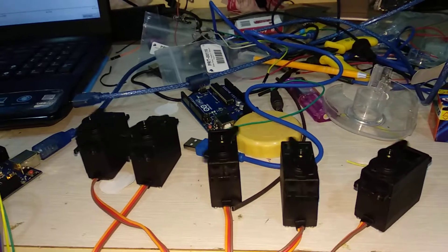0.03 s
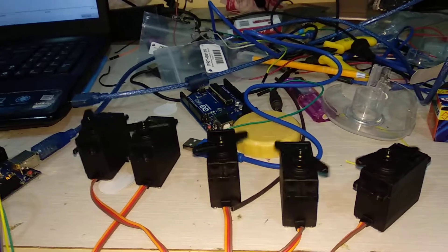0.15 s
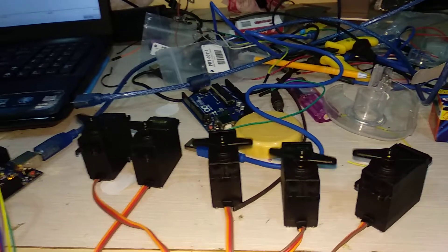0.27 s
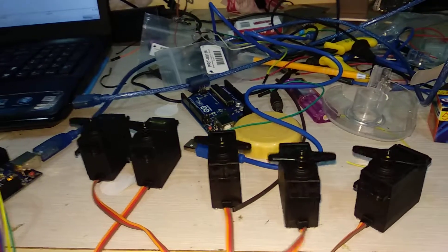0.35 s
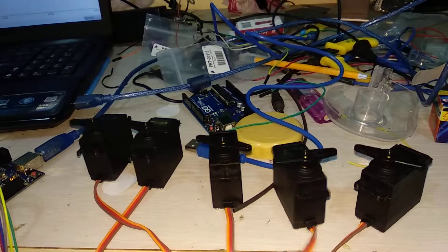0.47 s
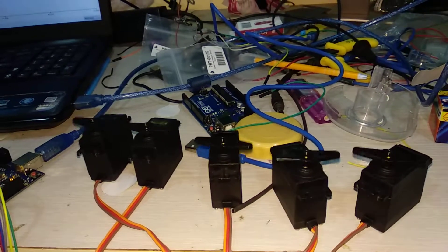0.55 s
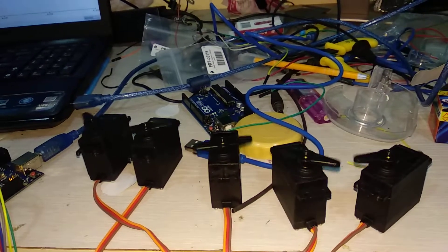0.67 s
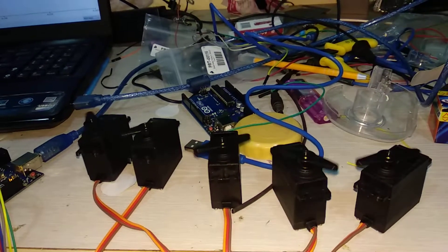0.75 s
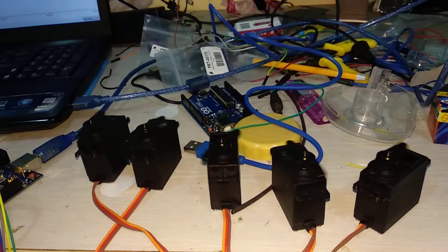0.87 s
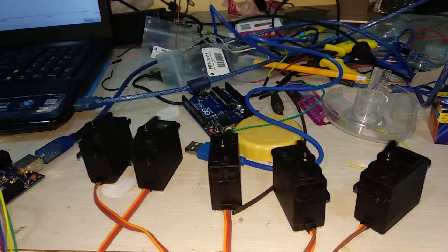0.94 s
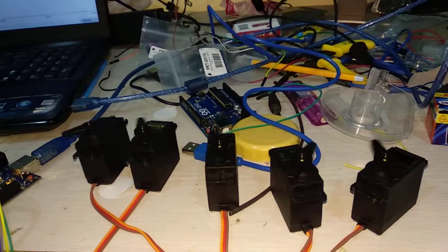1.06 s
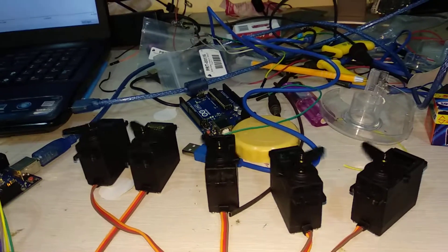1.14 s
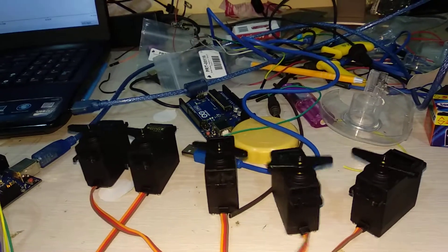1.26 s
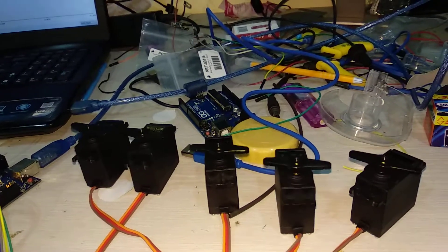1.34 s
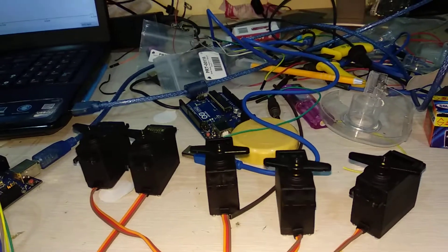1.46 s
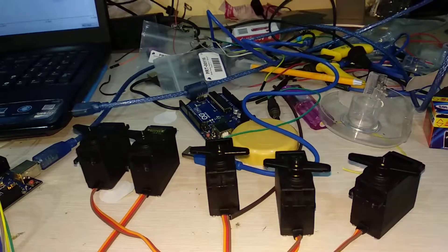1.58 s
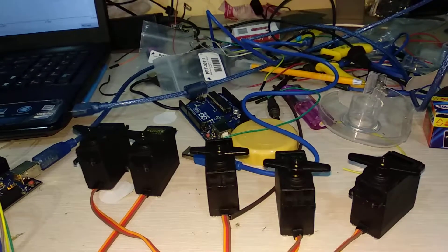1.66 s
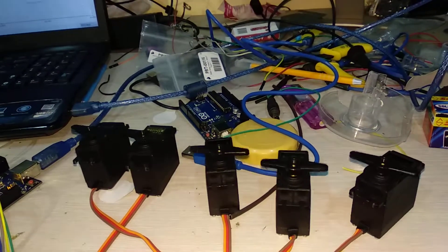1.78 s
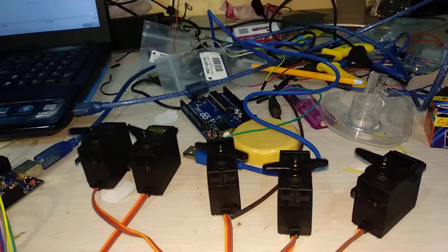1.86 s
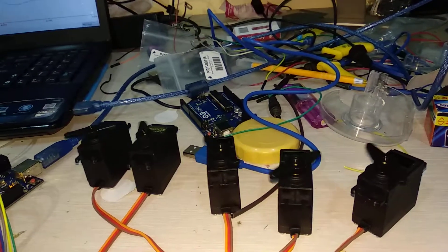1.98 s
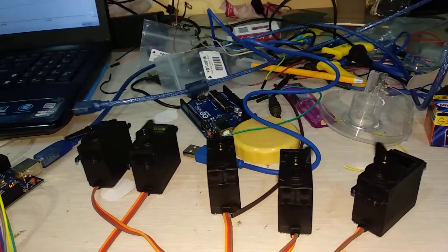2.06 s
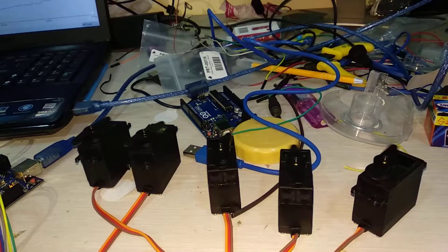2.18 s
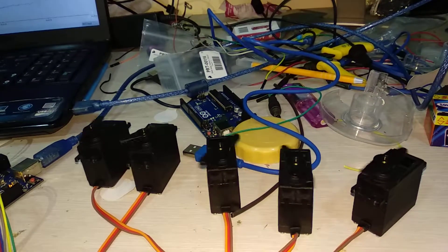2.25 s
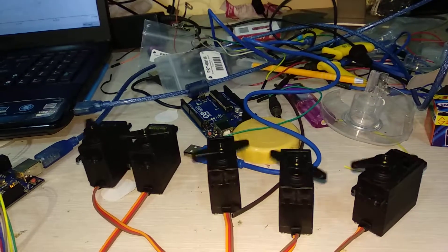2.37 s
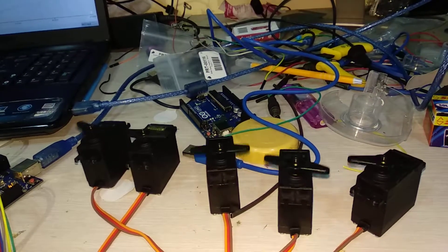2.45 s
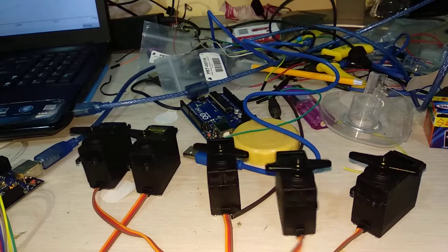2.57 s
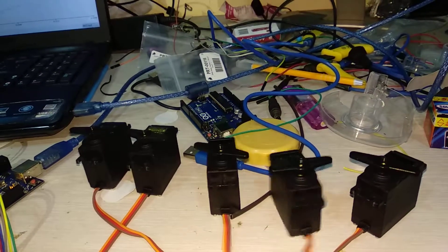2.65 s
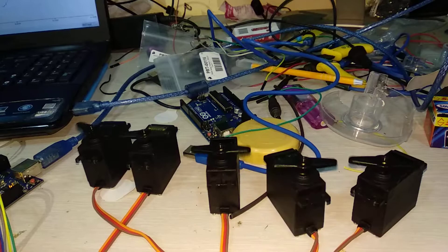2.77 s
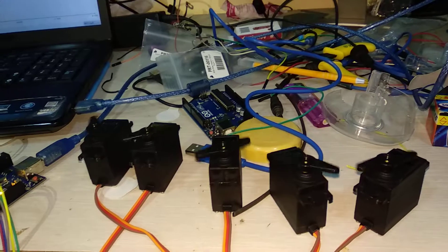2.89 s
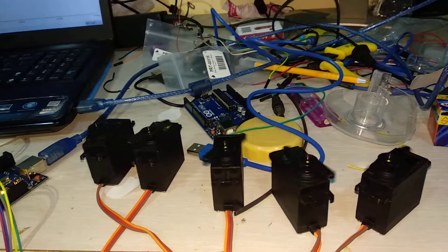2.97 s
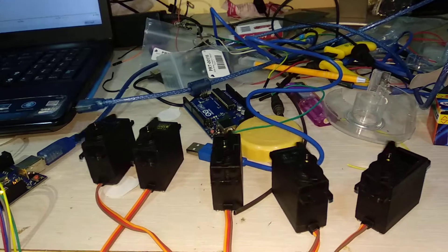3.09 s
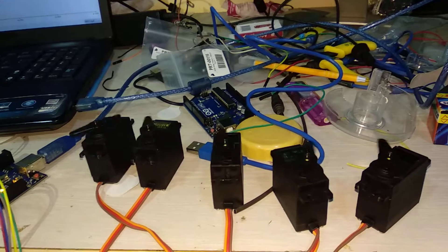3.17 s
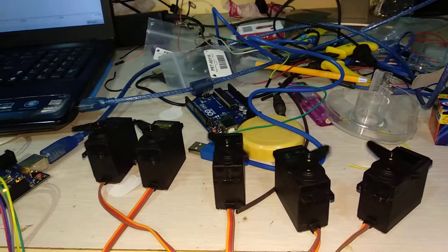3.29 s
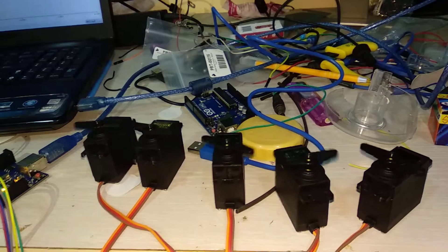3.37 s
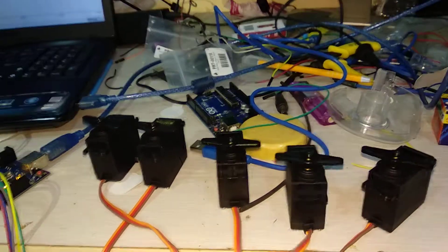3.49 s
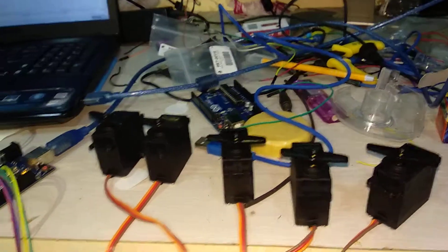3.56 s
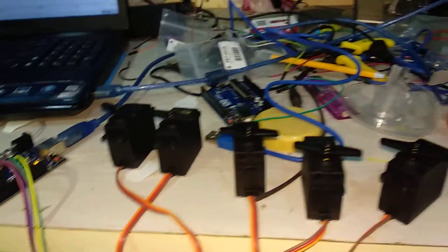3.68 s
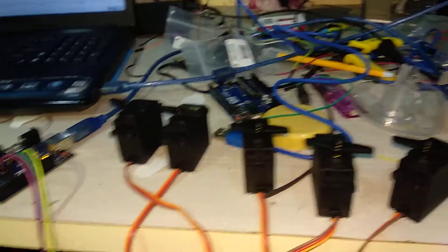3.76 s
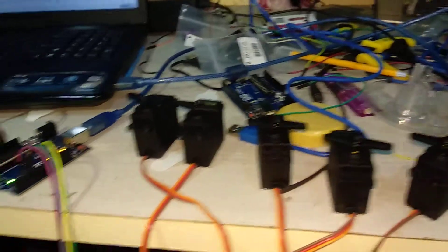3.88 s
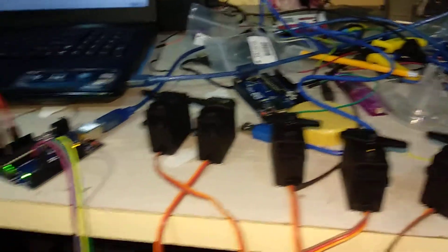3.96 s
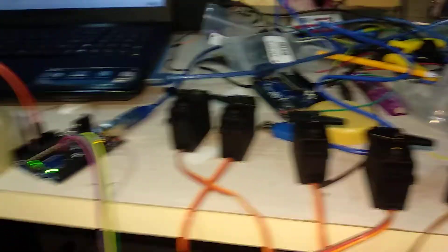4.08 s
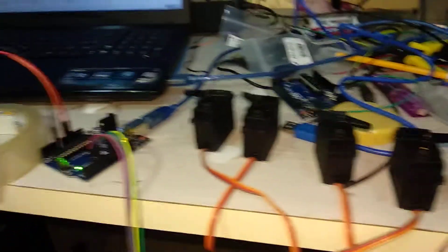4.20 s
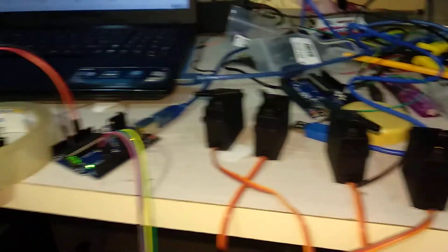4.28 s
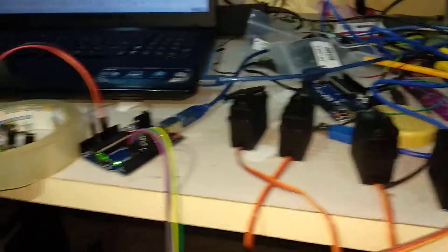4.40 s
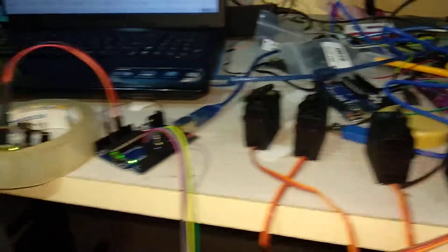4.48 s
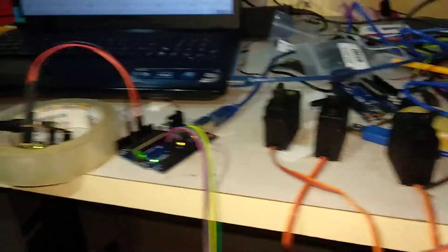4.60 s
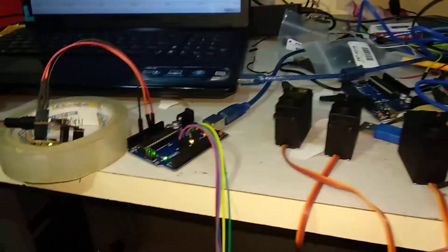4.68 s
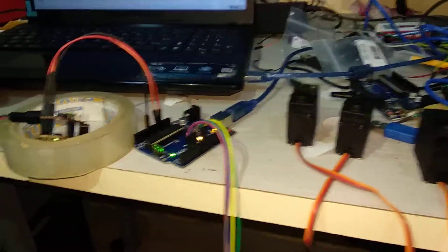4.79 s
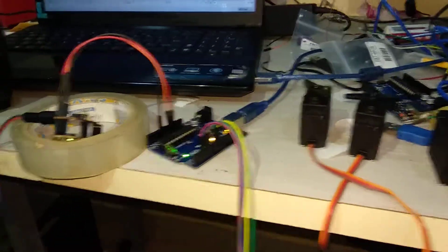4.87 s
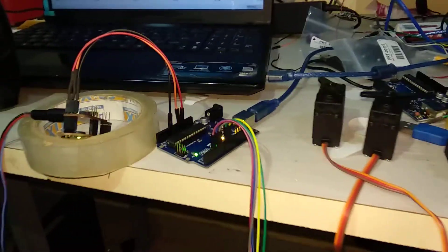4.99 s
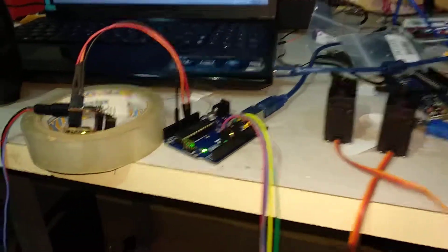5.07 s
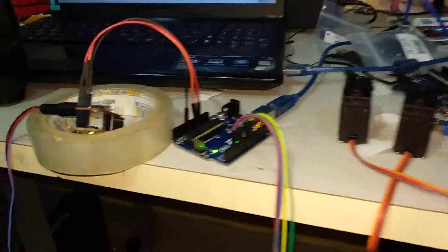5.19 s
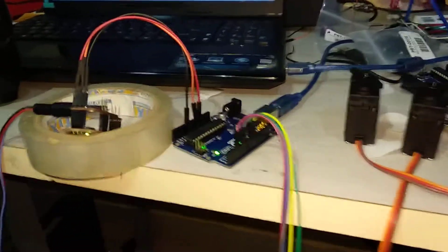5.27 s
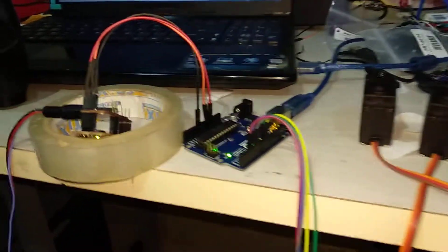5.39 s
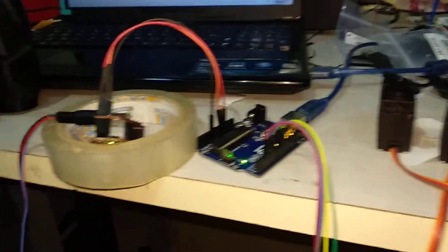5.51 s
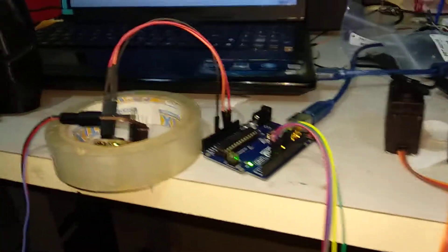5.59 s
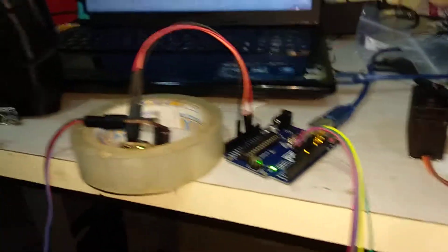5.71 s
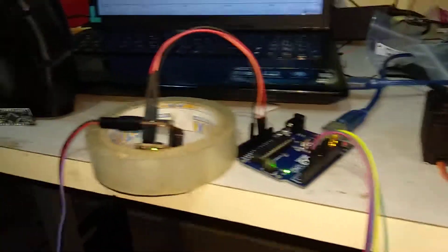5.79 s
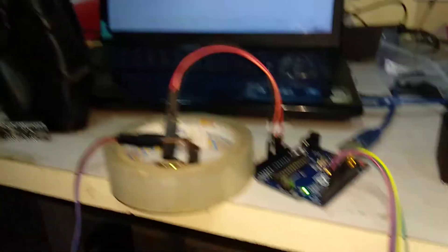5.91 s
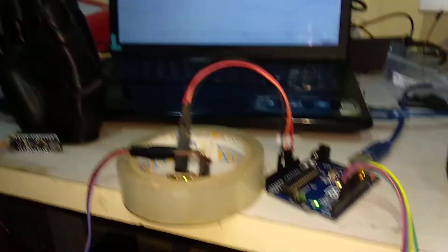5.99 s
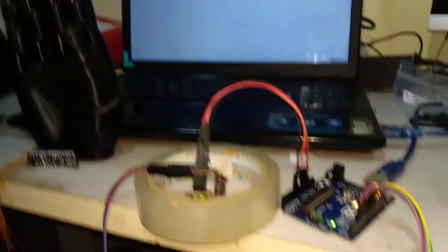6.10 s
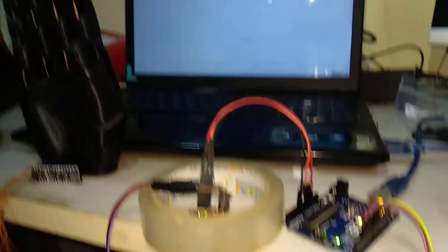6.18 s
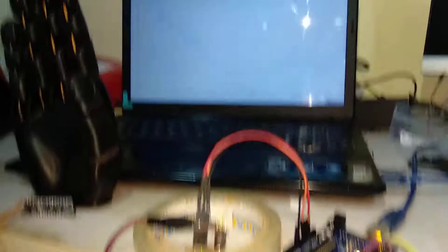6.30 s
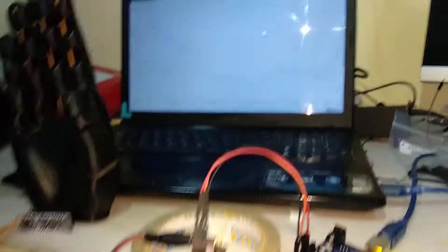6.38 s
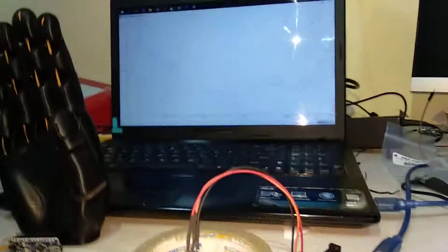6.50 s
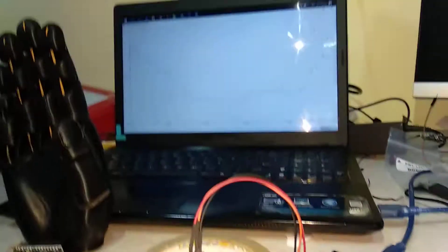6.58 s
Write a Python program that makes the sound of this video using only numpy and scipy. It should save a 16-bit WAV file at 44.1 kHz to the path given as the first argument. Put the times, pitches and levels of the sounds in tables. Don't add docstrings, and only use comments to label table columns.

```python
import sys
import numpy as np
from scipy import signal
from scipy.fft import rfft, irfft, next_fast_len
from scipy.io import wavfile
from scipy.ndimage import uniform_filter1d, minimum_filter1d

SR = 44100
rng = np.random.default_rng(int(sys.argv[2]) if len(sys.argv) > 2 else 0)


def convert_level_to_amplitude(level_db):
    exponent = np.asarray(level_db, float) / 20
    return 10 ** exponent


def persist_wave(psi):
    counts = np.round(np.clip(psi, -1, 1) * 32767).astype(np.int16)
    wavfile.write(sys.argv[1], SR, np.atleast_2d(counts).T)


N = 293264


def evened(x):
    return x / np.sqrt(np.mean(x ** 2) + 1e-20)


def coloured(x, points, outside_db=-70):
    f, db = np.transpose(points)
    size = next_fast_len(len(x))
    hz = np.fft.rfftfreq(size, 1 / SR) + 1
    gain_db = np.interp(np.log(hz), np.log(f), db, outside_db, outside_db)
    return irfft(rfft(x, size) * convert_level_to_amplitude(gain_db), size)[:len(x)]


def ring(x, hz, width_hz):
    r = np.exp(-np.pi * width_hz / SR)
    w = 2 * np.pi * hz / SR
    return signal.lfilter([0, np.sin(w)], [1, -2 * r * np.cos(w), r * r], x)


def wander(length, per_s):
    pole = np.exp(-2 * np.pi * per_s / SR)
    return evened(signal.lfilter([1], [1, -pole], rng.standard_normal(length)))


def add(mix, s, sound):
    part = mix[round(s * SR):][:len(sound)]
    part += sound[:len(part)]


# pitch_hz, level_db (per Hz)
ROOM_COLOUR = [(30, -63), (60, -19.5), (90, -4.5), (130, -7), (230, -12.5), (350, -7), (550, -9),
               (750, -12), (920, -12), (1900, -13.5), (5200, -24), (9400, -22.5), (12500, -28.5),
               (16000, -38.5)]


def room():
    level_db = -43.5 + 0.99 * wander(N, 2.7)
    return convert_level_to_amplitude(level_db) * evened(coloured(rng.standard_normal(N), ROOM_COLOUR))


STROKES_DB = [0, -20, -22, -22, -20, -9]
# pitch_hz, width_hz, facing_desk_db, turned_away_db
THROB_RINGS = [(325, 50, -1, -8), (400, 6, -5, 1), (465, 16, -7, -14), (500, 6, -16, -5),
               (530, 30, -10, -18), (605, 45, -16, -7), (662, 9, -5.5, -10), (710, 40, -18, -12)]


def throb():
    turns_per_s, first_stroke_s = 16.659, .0535
    count = np.arange(int(N / SR * turns_per_s * 6) - 6)
    chance = rng.standard_normal((len(count), 2))
    start_s = first_stroke_s + count / (6 * turns_per_s) + .00005 * chance[:, 0]
    strokes = np.zeros(N)
    strokes[(start_s * SR).astype(int)] = convert_level_to_amplitude(np.array(STROKES_DB)[count % 6] + 1.8 * chance[:, 1])
    away = np.interp(np.arange(N) / SR, (4.3, 4.9), [0, 1])
    rings = sum(convert_level_to_amplitude(near_db + away * (far_db - near_db)) * evened(ring(strokes, hz, width_hz))
                for hz, width_hz, near_db, far_db in THROB_RINGS)
    walls = signal.butter(4, [265, 800], "band", fs=SR, output="sos")
    return convert_level_to_amplitude(-46) * evened(signal.sosfilt(walls, rings))


# start_s, level_db (peak)
GRIP_SHIFTS = [(1.749, -36), (2.49, -42), (2.969, -43), (3.14, -39), (4.76, -45), (5.261, -44),
               (5.349, -42), (5.62, -35.5), (6.449, -46)]


def grip_bumps():
    pushes = np.zeros(N)
    for s, peak_db in GRIP_SHIFTS:
        add(pushes, s, convert_level_to_amplitude(peak_db) * np.hanning(260) / 90)
    return ring(pushes, 97, 25)


# start_s, length_s
SEALS = [(0.428, 0.21), (0.686, 0.024), (0.729, 0.051), (0.803, 0.021), (1.042, 0.031), (1.14, 0.011),
         (1.457, 0.026), (1.515, 0.016), (1.63, 0.017), (1.781, 0.0073), (2.16, 0.009), (2.24, 0.009),
         (2.476, 0.005), (2.491, 0.063), (2.544, 0.016), (2.606, 0.23), (2.846, 0.018), (2.986, 0.054),
         (3.135, 0.019), (3.485, 0.019), (3.598, 0.049), (3.795, 0.017), (4.79, 0.006), (4.822, 0.025),
         (5.99, 0.012), (6.358, 0.0092), (6.442, 0.026)]
# start_s, level_db (peak), direction (push or pull)
THUMPS = [(0.978, -48, 1), (1.416, -45, -1), (2.384, -44, 1), (2.543, -42, -1), (2.94, -42, 1),
          (3.183, -40, -1), (3.406, -45, -1), (3.544, -44, 1), (3.727, -36, 1), (3.916, -44, 1),
          (4.51, -37, 1), (4.855, -47, -1), (5.462, -43, -1), (5.554, -37, -1), (6.001, -28.5, -1),
          (6.162, -37.5, -1), (6.245, -47, -1)]
# pitch_hz, level_db (per Hz)
COVERED_HISS = [(40, -59), (85, -4.5), (200, -13), (500, -22), (1200, -26.5), (2000, -28.5), (4500, -31),
                (8000, -33.5), (12000, -30), (15500, -27), (16500, -35)]
# pitch_hz, level_db
FINGER_LEAK = [(200, -30), (400, -41), (2800, -44), (5000, -40), (6300, -36), (7500, -41), (9000, -44),
               (11000, -39), (12300, -39), (13000, -50), (16000, -54)]


def covered_port(sound):
    tremor_per_s, tremor_db, tremor_spread_db = 25, -56, 4.5
    open_port = np.ones(N)
    for s, length_s in SEALS:
        open_port[round(s * SR):round((s + length_s) * SR)] = 0

    moment, way, size = rng.random((N, 3)).T
    tremor = convert_level_to_amplitude(tremor_db + tremor_spread_db * (2 * size - 1)) * np.sign(way - .5)
    presses = (moment < tremor_per_s / SR) * tremor
    presses = presses * minimum_filter1d(open_port, size=2000)
    for s, peak_db, direction in THUMPS:
        presses[round(s * SR)] = np.sign(direction) * convert_level_to_amplitude(peak_db)
    thumps = ring(presses, 95, 22) + 0.71 * ring(presses, 260, 320)

    hiss = convert_level_to_amplitude(-61.5) * evened(coloured(rng.standard_normal(N), COVERED_HISS))
    scatter = rng.standard_normal(5000) * np.exp(-np.arange(5000) / 1800)
    scatter = scatter / np.linalg.norm(scatter)
    through_body = signal.oaconvolve(coloured(sound, FINGER_LEAK, outside_db=-60), scatter)[:N]
    return (hiss + through_body) * uniform_filter1d(open_port, 60) + 0.8 * thumps


SHAFT_FACTORS = [1.025, 1.0, .955, .98]


def rattle(shaft_hz, knock, sharp, spread_db, lead):
    out = np.zeros(len(shaft_hz))
    for k, factor in enumerate(SHAFT_FACTORS):
        uneven_hz = shaft_hz * factor * (1 + .02 * wander(len(out), 60))
        turns = np.cumsum(uneven_hz) / SR + rng.random()
        knocks = convert_level_to_amplitude(spread_db * np.minimum(rng.exponential(1, size=900), 4))
        strength = knocks[turns.astype(int)]
        burst = np.sin(np.pi * (turns % 1) ** .8) ** sharp
        gain = 1 if k else lead
        out += gain * (1 + knock * strength * burst) * rng.standard_normal(len(out))
    return out


def whine(segments_hz):
    turns = np.cumsum(segments_hz * (1 + .0008 * wander(len(segments_hz), 30))) / SR
    k = np.arange(16, 25)[:, None]
    flutter = np.array([convert_level_to_amplitude(3.0 * wander(len(turns), 8)) for _ in k])
    spring = 1 / (1 + ((k * segments_hz - 11500) / 1300) ** 2)
    spring = spring * (k * segments_hz < 12820)
    steady = (segments_hz / segments_hz.max()) ** 5
    tones = np.cos(2 * np.pi * (k * turns + rng.random(k.shape)))
    return steady * (spring * flutter * tones).sum(0)


# shaft_turns_per_s, spin_up_s, segments_per_s, settling_s
MOTORS = [(185, .14, 532, .14), (188, .11, 563, .09), (150, .05, 532, .05)]
# short_at_start_db, catch_up_s, lost_at_standstill_db, lateness (exponent of the loss)
PARTS = [(-8, 0.024, -18.5, 4.3), (-15, 0.044, -21.5, 4.3), (-19.5, 0.043, -20.5, 2.65),
         (-16.5, 0.043, -22.5, 4.1)]


def move(times, way, twist, before_db, after_db):
    on_s, stop_s, brake_s, soft_s = times
    top_shaft, spin_up_s, top_segments, settle_s = MOTORS[way]
    t = np.arange(max(on_s, 0), stop_s + .06, 1 / SR)
    since = t - on_s
    braking = np.maximum(1 - (stop_s - t) / brake_s, 0)
    share = np.maximum(1 - .38 * np.exp(-(since / spin_up_s) ** 1.5) - .3 * braking ** 2, .3)
    steadiest = np.maximum(1 - .26 * np.exp(-since / settle_s) - .3 * braking ** 3, .3)
    steadiest = steadiest - [.032, 0, 0][way] * np.exp(-((since - .39) / .08) ** 2)

    held_db = [np.interp(t, twist, pair) for pair in zip(before_db, after_db)]
    reversal_db = [0.5, -3, 2.5][way] * np.exp(-since / 0.14)
    start_db = 20 * np.log10(np.clip(since / soft_s, 1e-3, 1)) + reversal_db
    levels = [db + start_db + short_db * np.exp(-since / catch_up_s) + lost_db * braking ** late
              for db, (short_db, catch_up_s, lost_db, late) in zip(held_db, PARTS)]
    lost = 1 - share
    hum_db = held_db[-1] - 12 * (np.tanh((lost / .09) ** 2) + lost)
    hum_db = hum_db + [-6, -65, -6][way] * braking ** 2
    return t, levels, top_shaft * share, top_segments * steadiest, hum_db


# pitch_hz, level_db (per Hz)
CASE = [(470, -78.5), (800, -24.5), (1060, -20.5), (1310, -13), (1410, -16), (1980, -6), (2040, -5.5),
        (2350, -5.5), (2780, 1), (4070, -14.5), (4800, -20.5), (6240, -27.5), (10600, -120)]
# pitch_hz, level_db (per Hz)
GEARS = [
    [(2590, -56), (4400, -19.5), (4700, -12.5), (5100, -7.5), (5550, -4.5), (6250, 4), (6870, -1),
     (7240, 5), (8000, -8), (10400, -12), (17600, -120)],
    [(2120, -37), (3600, 0.5), (4460, -9.5), (4810, -4.5), (5600, -8), (6330, -2.5), (6860, -9),
     (8000, -2.5), (10400, -22), (17600, -120)],
]
# pitch_hz, level_db (per Hz)
PINION = [(4470, -20), (7600, 0), (8900, -0.5), (10400, -2.5), (12700, -21), (13000, -38), (22000, -120)]
PINION_AWAY = [(4470, -24.5), (6800, -7), (7800, 0), (8900, 0.5), (10400, -2.5), (13500, -26),
               (22000, -120)]
# pitch_hz, level_db (per Hz)
BRUSHES = [
    [(5880, -79), (10000, -3), (12100, -1.5), (12500, -8), (12780, -8), (12900, -40), (13500, -40),
     (13700, -16), (14500, -11), (15200, -8), (16000, -12)],
    [(5880, -25.5), (10000, -4.5), (11600, 0.5), (13500, -11), (15100, -2.5), (16000, -11)],
    [(5880, -31), (10000, -4), (12000, 3.5), (12500, -4.5), (13900, -10.5), (15100, -9.5), (16000, -24)],
]


def swing(motion, colours, whine_db):
    t, (case_db, gear_db, pinion_db, brush_db), shaft, segments_hz, hum_db = motion
    facing, brush_way = colours
    out = convert_level_to_amplitude(case_db) * evened(coloured(rattle(shaft, 1.03, 5.0, 3.0, lead=1.33), CASE))
    ticks = rattle(shaft, 2.6, 70., 2.6, lead=1.8)
    out += convert_level_to_amplitude(gear_db) * evened(coloured(ticks, GEARS[facing]))
    out += convert_level_to_amplitude(pinion_db) * evened(coloured(ticks, [PINION, PINION_AWAY][facing]))

    hiss = evened(coloured(rattle(3 * shaft, 0.88, 8.0, 1.5, lead=1.5), BRUSHES[brush_way]))
    tone = evened(whine(segments_hz)) + convert_level_to_amplitude(-5) * evened(whine(3.066 * shaft))
    out += convert_level_to_amplitude(brush_db) * (convert_level_to_amplitude(whine_db) * tone + hiss)

    spin = 2 * np.pi * np.cumsum(shaft * (1 + .007 * wander(len(t), 12))) / SR
    octave_db = -13 + np.minimum(hum_db.max() - hum_db, 9)
    orders = np.sin(2 * spin) + convert_level_to_amplitude(-12.5) * np.sin(spin) + convert_level_to_amplitude(octave_db) * np.sin(4 * spin)
    out += np.sqrt(2) * convert_level_to_amplitude(hum_db + 1.9 * wander(len(t), 10)) * orders
    return 2 * out


# start_s (power on), standstill_s, braking_s, soft_start_s
SWINGS = [
    (-.445, .475, 0.29, .01),
    (.478, 1.415, .25, 0.051),
    (1.714, 2.635, 0.29, .005),
    (2.632, 3.555, 0.27, .045),
    (4.066, 4.765, 0.056, 0.041),
    (4.6, 5.04, 0.11, 0.093),
    (1.3, 1.74, 0.042, 0.11),
]
WAYS = [0, 1, 0, 1, 0, 2, 2]
# twist_start_s, twist_end_s
TWISTS = [(0, .3), (.63, 1.4), (1.85, 2.9), (3.2, 3.33), (4.2, 4.7), (4.76, 4.95), (1.42, 1.6)]
# case_db, gear_train_db, pinion_db, brushes_db, hum_db
BEFORE_DB = [(-36, -36.5, -37, -38.5, -47.5), (-34.5, -36, -37.5, -38.5, -49.5),
             (-36, -36.5, -35.5, -37.5, -45.5), (-35, -37, -38, -39.5, -50),
             (-35.5, -35.5, -31.5, -29, -46), (-45.5, -45.5, -56, -37.5, -85), (-56, -61.5, -69, -72, -85)]
AFTER_DB = [(-35.5, -37, -35, -37.5, -49.5), (-33, -33, -40, -40, -50), (-34, -38.5, -34.5, -37, -50),
            (-31, -36.5, -53, -32.5, -46.5), (-36.5, -39.5, -33, -29, -47.5), (-58.5, -55, -75, -49, -89),
            (-59, -64.5, -75, -76, -85)]
COLOURS = [(0, 0), (0, 1), (0, 0), (0, 1), (1, 2), (1, 2), (0, 1)]
WHINE_DB = [-4.5, -10, -4.5, -11, -2.5, -60, -60]


def servos():
    out = np.zeros(N)
    for times, way, twist, before_db, after_db, colours, whine_db in zip(
            SWINGS, WAYS, TWISTS, BEFORE_DB, AFTER_DB, COLOURS, WHINE_DB):
        motion = move(times, way, twist, before_db, after_db)
        add(out, motion[0][0], swing(motion, colours, whine_db))
    return out


def scene():
    left = room() + throb() + grip_bumps() + servos()
    return np.array([left, covered_port(left)])


def top_cut(x):
    return signal.sosfilt(signal.butter(12, 16870, fs=SR, output="sos"), x)


def record(dry):
    low_cut = signal.butter(3, 58, "high", fs=SR, output="sos")
    mix = signal.sosfilt(low_cut, dry)
    return top_cut(mix)


dry = scene()
out = record(dry)
persist_wave(out)
```